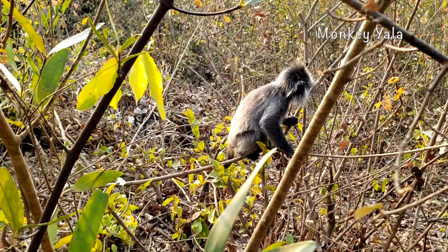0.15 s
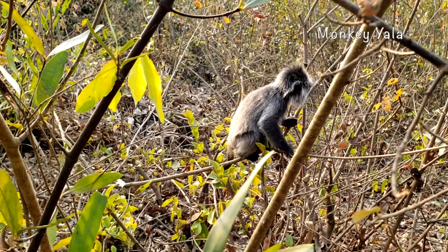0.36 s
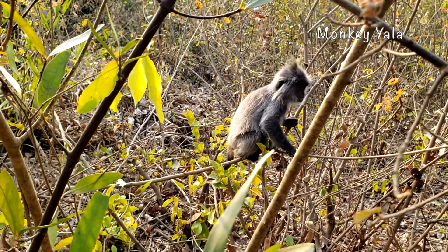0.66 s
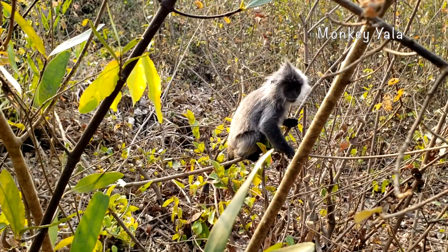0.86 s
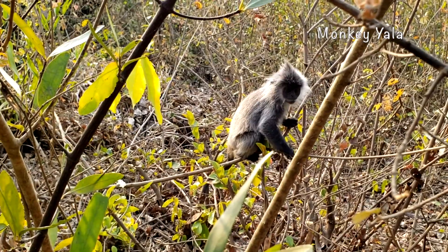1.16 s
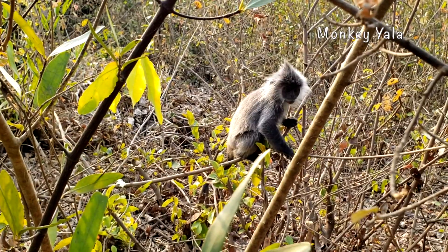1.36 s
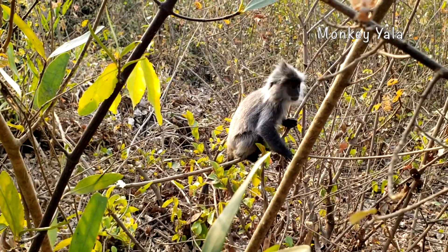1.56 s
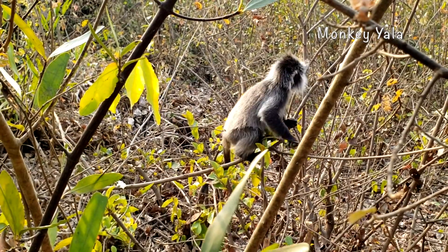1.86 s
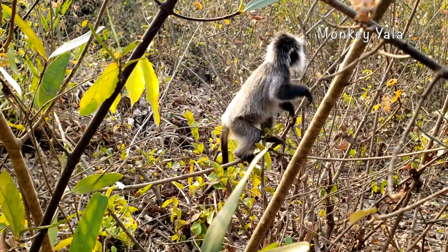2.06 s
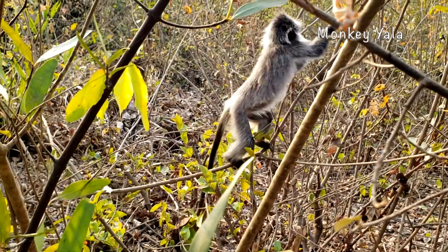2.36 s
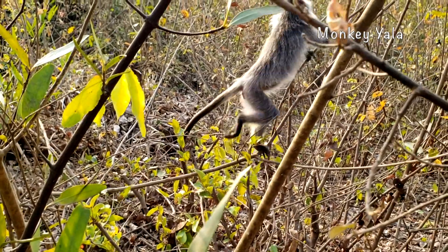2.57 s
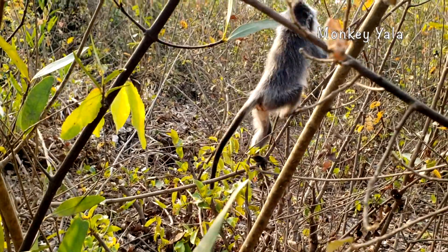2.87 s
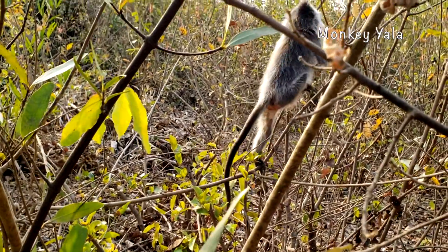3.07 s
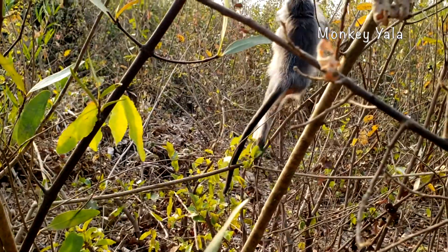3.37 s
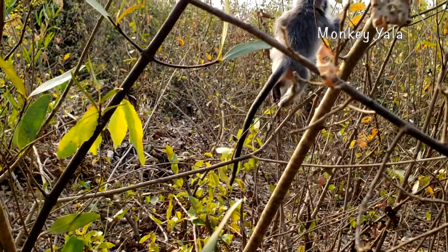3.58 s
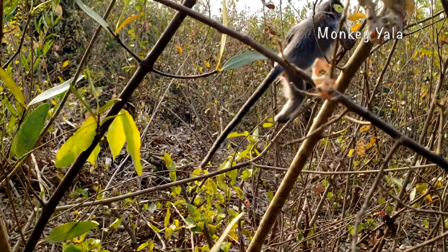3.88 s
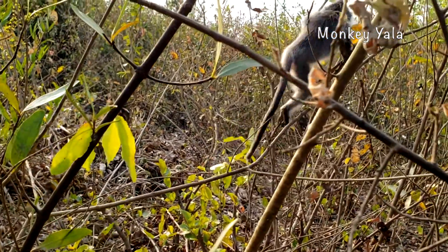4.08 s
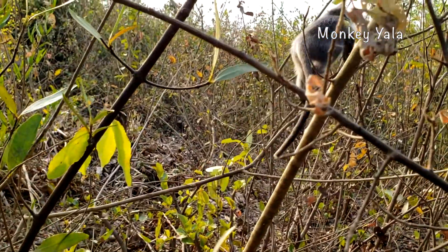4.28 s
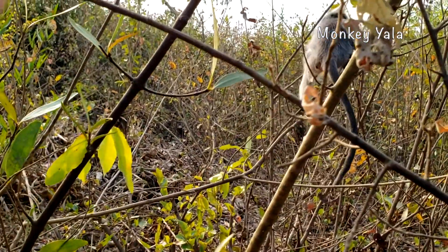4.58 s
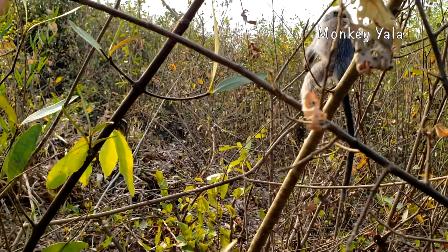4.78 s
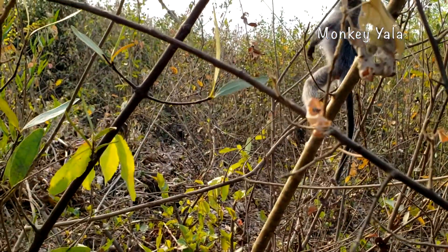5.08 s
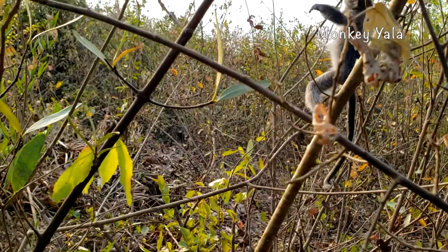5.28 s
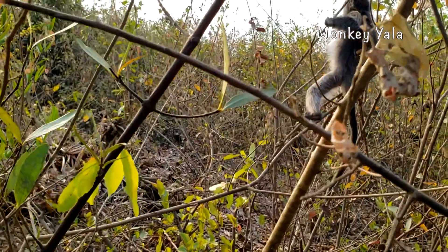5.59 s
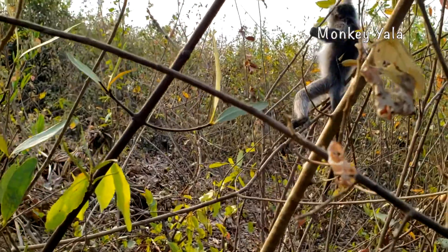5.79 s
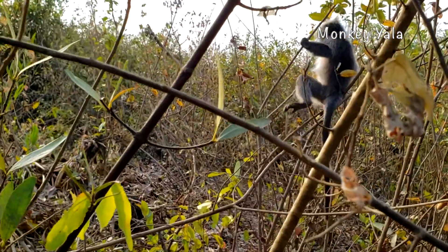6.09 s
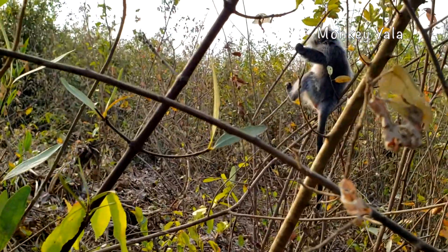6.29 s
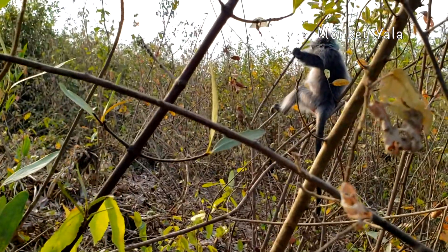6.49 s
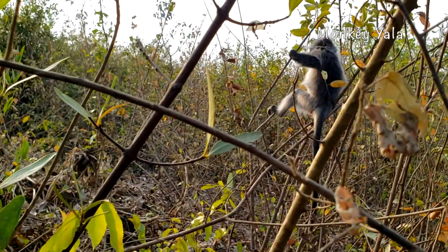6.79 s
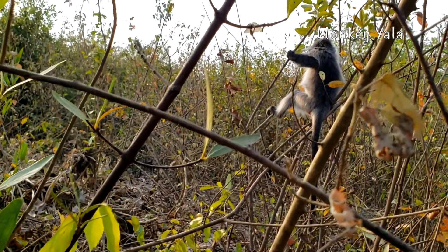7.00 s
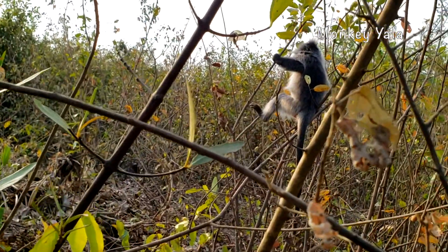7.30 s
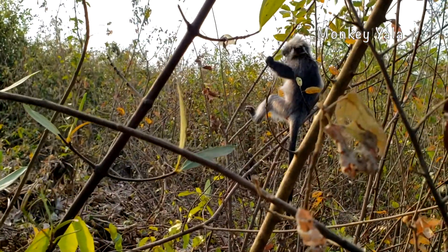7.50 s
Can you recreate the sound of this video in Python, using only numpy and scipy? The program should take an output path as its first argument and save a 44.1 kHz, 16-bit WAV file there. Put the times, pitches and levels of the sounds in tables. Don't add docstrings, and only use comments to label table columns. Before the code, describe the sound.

Outdoors in dry scrub, a near songbird opens with quick swooping warbles while a more distant bird repeats sharp V-shaped chirps. As they stop, a small animal climbs close to the microphone, scraping dry leaves and cracking twigs, busiest midway. The songbird then returns with a longer, lively bout of trills and arched notes. Low wind rumble and occasional thumps sit mostly on the right.

```python
import sys
import numpy as np
from scipy import signal
from scipy.fft import rfft, irfft
from scipy.io import wavfile
from scipy.ndimage import uniform_filter1d

SR = 44100
rng = np.random.default_rng(int(sys.argv[2]) if len(sys.argv) > 2 else 0)


def dump_mix(stems):
    frames = np.atleast_2d(stems).T
    limited = np.clip(frames, -1, 1)
    pcm = np.round(limited * 32767).astype(np.int16)
    wavfile.write(sys.argv[1], SR, pcm)


def gain_from_db(level_db):
    decades = np.asarray(level_db, float) / 20
    return 10 ** decades


N = 337365
TIME = np.arange(N) / SR


def curve(table):
    return np.interp(TIME, *np.transpose(table))


def by_hz(table, hz):
    f, value = np.transpose(table)
    return np.interp(np.log(hz + 1), np.log(f + 1), value)


def colour(x, table):
    hz = np.fft.rfftfreq(x.shape[-1], 1 / SR)
    top_hz = 15980
    return irfft(rfft(x) * gain_from_db(by_hz(table, hz)) * (hz < top_hz), x.shape[-1])


def band(x, lo_hz, hi_hz):
    return signal.sosfilt(signal.butter(2, [lo_hz, hi_hz], "bandpass", fs=SR, output="sos"), x)


def unit(x):
    return x / np.sqrt(np.mean(x ** 2))


def smooth(x, size):
    return uniform_filter1d(x, size=size)


def walk(rate_hz):
    k = int(SR / rate_hz)
    held = np.repeat(rng.standard_normal(N // k + 1), k)
    return unit(smooth(smooth(held, k), k)[:N])


def pan(x, db, lag=0):
    return np.array([x * gain_from_db(db / 2), np.roll(x, lag) * gain_from_db(-db / 2)])


def add(track, start_s, sound):
    i = int(start_s * SR)
    track[i:i + len(sound)] += sound[:N - i]


def glide(t, knots, values):
    gaps = np.diff(knots)
    slope = np.diff(values) / gaps
    same = np.maximum(slope[1:] * slope[:-1], 0)
    lean = np.r_[slope[0], 2 * same / (slope[1:] + slope[:-1] + 1e-9), slope[-1]]
    k = np.clip(np.searchsorted(knots, t, side="right") - 1, 0, len(slope) - 1)
    h = gaps[k]
    u = (t - knots[k]) / h
    ease = u * u * (3 - 2 * u)
    bend = (1 - u) * lean[k] - u * lean[k + 1]
    return values[k] + ease * h * slope[k] + h * u * (1 - u) * bend


def whistle(ms, hz, db, wobble=.005, third_db=-28, edge_ms=3, flutter=0):
    t = np.arange(0, ms[-1], 1000 / SR)
    pitch = glide(t, ms, np.asarray(hz, float))
    pitch *= 1 + wobble * unit(smooth(rng.standard_normal(len(t)), 60))

    flutter_hz, below_hz, settled_ms = 120, 3250, 45
    low_start = np.clip((below_hz - pitch) / 600, 0, 1) * np.clip((settled_ms - t) / 8, 0, 1)
    pitch *= 1 + flutter * low_start * np.sin(2 * np.pi * flutter_hz * t / 1000)

    level_db = glide(t, ms, db)
    waver = unit(smooth(smooth(rng.standard_normal(len(t)), 100), 100))
    softness = np.clip((level_db.max() - level_db) / 14, 0, 1)
    pitch *= 1 + .015 * softness * waver

    phase = 2 * np.pi * np.cumsum(pitch) / SR
    edges = np.clip(np.minimum(t, ms[-1] - t) / edge_ms, 0, 1)
    third = gain_from_db(third_db) * np.clip(1 - np.abs(pitch - 4200) / 900, 0, 1)
    tone = np.sin(phase) + third * np.sin(3 * phase)
    return np.sqrt(2) * gain_from_db(level_db) * edges * tone


def arch(length_s, start_hz, mid_hz, end_hz, db, wobble=0.01):
    u = np.linspace(0, 1, num=9)
    hz = np.polyval(np.polyfit([0, .5, 1], [start_hz, mid_hz, end_hz], deg=2), u)
    return whistle(1000 * length_s * u, hz, db - 8 * (2 * u - 1) ** 4, wobble, -52)


def scrub(x, t60_s, wet_db, sparse_db):
    t = np.arange(int(SR / 2)) / SR
    tail = rng.standard_normal((2, len(t))) * gain_from_db(sparse_db * rng.standard_normal((2, len(t))))
    tail = tail * gain_from_db(-60 * t / t60_s) * (1 - np.exp(-t / 0.0027))
    tail = tail / np.sqrt(np.sum(tail ** 2, axis=1, keepdims=True))
    return gain_from_db(wet_db) * signal.fftconvolve(x[None], tail, axes=1)[:, :N]


def air():
    # freq_hz, level_db (per Hz)
    spectrum = [(18, -30), (30, -9), (82, -1), (249, -13), (476, -26), (2500, -30), (3500, -23),
                (5300, -33), (7400, -46), (9500, -39), (11500, -31), (16000, -32)]
    # freq_hz, difference_db
    lean_left = [(100, -5.5), (400, -6), (1000, -2.5), (2400, 0), (15000, -3)]
    # freq_hz, likeness (0-1)
    likeness = [(60, 1), (200, 0.83), (700, 0.3), (1400, 0)]
    hz = np.fft.rfftfreq(N, 1 / SR)
    alike = np.clip(by_hz(likeness, hz), 0, 1)
    mid, side = rfft(colour(rng.standard_normal((2, N)), spectrum))
    ports = []
    for sign in (1, -1):
        port = mid * np.sqrt(1 + alike) + sign * side * np.sqrt(1 - alike)
        ports.append(port * gain_from_db(sign * by_hz(lean_left, hz) / 2))
    return unit(irfft(np.array(ports), N)) * gain_from_db(-63)


def wind():
    # time_s, level_db
    gust_levels = [(0.0, -59), (0.13, -77), (0.21, -57.5), (0.58, -67.5), (3.22, -66.5), (3.28, -46),
                   (3.32, -53), (3.43, -50), (3.47, -68), (3.64, -53), (4.43, -69.5), (4.69, -60),
                   (5.69, -65), (5.73, -44.5), (5.94, -55), (7.09, -65.5), (7.5, -53), (7.65, -61.5)]
    # time_s, peak_db, pitch_hz
    thumps = [
        (3.283, -40, 61),
        (5.75, -33, 54.2),
    ]
    gusts = unit(band(rng.standard_normal((2, N)), 33.3, 83))
    gusts = gusts * gain_from_db(curve(gust_levels) + 2 * walk(9) - 2.5)
    right = gusts[0]
    for s, db, hz in thumps:
        swell = np.exp(-((TIME - s) / 0.015) ** 2)
        right = right + gain_from_db(db) * swell * np.cos(2 * np.pi * hz * (TIME - s))
    right = 2 * right

    brush_s, brush_length_s, brush_db = 6.93, .09, -73
    brush = np.exp(-((TIME - brush_s) / brush_length_s) ** 2)
    right += gain_from_db(brush_db) * brush * unit(band(rng.standard_normal(N), 220, 650))
    return np.array([0.08 * right + 0.62 * gusts[1], right])


def chorus():
    # time_s, level_db
    chorus_levels = [(0, -64.5), (1.2, -64), (1.45, -62.5), (1.9, -65.5), (2.4, -69.5), (4, -91.5),
                     (5.2, -75), (6, -65), (7.65, -61.5)]
    blur = 0
    for lo in (2600, 3100, 3800, 4400):
        voices = band(band(rng.standard_normal((2, N)), lo, 1.3 * lo), lo, 1.3 * lo)
        blur = blur + gain_from_db(3 * walk(14)) * unit(voices)
    return gain_from_db(curve(chorus_levels)) * unit(blur)


def piper(far):
    # start_s, peak_db
    piped = [(2.5207, -68), (2.6379, -68), (2.8094, -66), (2.9642, -63), (3.1183, -59), (3.2735, -55.5),
             (3.4306, -54.5), (3.6032, -55.5), (3.7544, -53), (4.0966, -63), (4.2527, -66.5)]
    warm_hz, climb_hz_per_s, warm_at_s = 3530, 900, 2.96
    for start, db in piped:
        hz = warm_hz - climb_hz_per_s * max(warm_at_s - start, 0)
        add(far, start, arch(0.044, .97 * hz, .995 * hz, 1.01 * hz, db - 2.5, wobble=.018))


def chatter(far):
    ms, hz = np.array([0, 8, 17, 28.]), [4300, 3150, 2750, 1800]
    shape_db = np.array([-7, -2, 0, -12.])
    for first_s, last_s, db, count in ((1.328, 1.795, -66.5, 8), (7.254, 7.444, -68, 4)):
        for start in np.linspace(first_s, last_s, count):
            add(far, start, whistle(ms, hz, db + shape_db, wobble=.035))


def calls(far):
    # start_s, length_s, start_hz, end_hz, level_db
    glides = [(.01, 0.028, 3860, 3810, -63), (2.53, 0.087, 5430, 5160, -74.5),
              (.08, 0.2, 1450, 1580, -76.5), (0.419, 0.012, 5600, 5000, -54), (.431, .008, 5050, 5550, -52),
              (.438, .009, 5500, 4750, -56), (1.44, .12, 5150, 4950, -67.5), (1.55, .065, 4850, 4400, -67),
              (1.62, .06, 4400, 3950, -76), (.004, .02, 2750, 2700, -63), (.212, .01, 5250, 5150, -60),
              (.274, .012, 5250, 5100, -58), (2.475, .035, 3250, 3780, -68), (2.228, .022, 5500, 6500, -72),
              (2.06, .07, 2050, 1900, -81), (5.22, .07, 900, 900, -79), (5.62, .08, 1120, 1080, -81),
              (5.8, .17, 1100, 1050, -84), (5.345, .05, 6800, 4900, -70), (5.505, .02, 4300, 6200, -62),
              (5.635, .025, 4600, 6300, -58), (5.79, .05, 5600, 5000, -68), (5.762, .02, 4000, 6600, -62),
              (6.04, .016, 3000, 5400, -63), (1.725, .032, 6700, 4900, -72), (2.31, 0.05, 6750, 4720, -76),
              (3.28, 0.15, 5150, 4560, -69), (3.922, .04, 3750, 3850, -59),
              (3.818, 0.16, 5800, 5820, -70.5), (4.37, .41, 3540, 3360, -72.5),
              (4.863, 0.11, 3450, 3430, -74), (2.37, 0.055, 2760, 3750, -73), (4.93, .31, 5410, 5400, -74),
              (4.92, .07, 6050, 6030, -72)]
    # start_s, length_s, foot_hz, top_hz, level_db
    flicks = [(2.74, 0.07, 1100, 1300, -79), (1.89, .014, 5300, 7000, -63), (1.906, .022, 5150, 8400, -69),
              (2.212, .025, 3240, 5400, -62), (5.45, .15, 1150, 1200, -78), (6.09, 0.027, 1820, 2100, -61)]
    # start_s, length_s, start_hz, middle_hz, end_hz, level_db
    hoarse = (1.925, .14, 4700, 3250, 2800, -63)
    for start, length, hz, end_hz, db in glides:
        mid_hz = 1.008 * (hz + end_hz) / 2
        add(far, start, arch(length, hz, mid_hz, end_hz, db))
    for start, length, hz, top_hz, db in flicks:
        add(far, start, arch(length, hz, top_hz, hz, db))
    rasp = arch(*hoarse[1:], wobble=.07) + .7 * arch(*hoarse[1:], wobble=.14)
    add(far, hoarse[0], rasp * np.linspace(1.9, .5, len(rasp)))


def croaks(far):
    croak_levels = [-72, -72, -76.5, -73, -77, -77.5, -68]
    gap_s, length_s, base_hz = .27, .11, 265
    for turn, db in enumerate(croak_levels):
        for k, part_db in ((6, -4), (7, 0), (8, -6)):
            hz = k * base_hz
            partial = arch(length_s, .88 * hz, hz, .87 * hz, db + part_db - 5.5, wobble=.03)
            add(far, turn * gap_s, partial)


def second_bird():
    # time_ms, pitch_hz, level_db (under its top)
    v_note = [(0, 5100, -12), (6.25, 4800, -4), (13.27, 4300, -3), (28.92, 3400, -2), (36, 2900, -26),
              (41.56, 3800, -1.5), (57.6, 4250, -13)]
    # first_s, last_s, first_db, last_db
    bouts = [
        (.354, 1.224, -51, -54),
        (6.134, 7.017, -54, -53.5),
    ]
    voice = np.zeros(N)
    ms, hz, shape_db = np.transpose(v_note)
    for bout in bouts:
        for start, db in np.linspace(bout[::2], bout[1::2], num=8):
            add(voice, start, whistle(ms, hz, shape_db + db))
            add(voice, start - .022, arch(0.036, 5960, 5700, 5300, db - 10.5, wobble=0.08))
    return voice


def distant_birds():
    second, far = second_bird(), np.zeros(N)
    for sing in (piper, chatter, calls, croaks):
        sing(far)
    far = far * gain_from_db(1.5 * walk(60))
    wet = scrub(second, .5, -1, 3) + scrub(far, .25, -5, 3)
    return pan(second, 1) + pan(far, -1.7) + wet + chorus()


def efforts(table):
    still_db = -94
    power = gain_from_db(2 * still_db)
    for s, db, rise, fall in table:
        away_db = 10 * np.maximum((s - TIME) / rise, (TIME - s) / fall)
        power = power + gain_from_db(2 * (db - away_db))
    return np.sqrt(power)


def rustle():
    # time_s, peak_db, rise_s (10 dB), fade_s (10 dB)
    movements = [(1.94, -66, .007, .06), (2.1, -62, .07, .14), (2.55, -65, .1, .3), (2.72, -59.5, .15, .15),
                 (3.1, -70, .5, .5), (3.3, -59, .1, .1), (3.49, -48.5, .12, .3), (3.745, -46.5, .08, .05),
                 (4.14, -57.5, .25, .25), (4.5, -69, .5, .8), (4.88, -67, .3, .08), (5.1, -67, .005, .3),
                 (5.42, -60, .05, .6), (5.8, -65.5, .3, .2), (6.1, -76, .5, 40)]
    # freq_hz, level_db (per Hz)
    leaf = [(600, -12), (1500, -17), (2500, -15), (4700, 1.5), (7400, -5.5), (10000, 1.5), (15000, 0)]
    scrapes_per_s = 160
    flurry = (rng.random(N) < scrapes_per_s / SR) * gain_from_db(np.minimum(2.5 * rng.exponential(size=N), 6))
    fade = np.exp(-np.arange(2000) / SR / 0.0063)
    scrape = 0
    for lo in (600, 3000, 4500, 6700, 10000, 13000):
        share = signal.fftconvolve(flurry * gain_from_db(3.9 * rng.standard_normal(N)), fade)[:N]
        grit = gain_from_db(2.3 * rng.standard_normal((2, N))) * rng.standard_normal((2, N))
        grit = grit + 0.17 * rng.standard_normal(N)
        level = (.45 + .6 * unit(share)) * gain_from_db(2.25 * walk(15))
        scrape = scrape + level * band(grit, lo, max(1.67 * lo, 3000))
    return unit(colour(scrape, leaf)) * efforts(movements) * gain_from_db(6.5)


def snaps():
    # time_s, peak_db, wood_db (woody part under the crack)
    snapped = [(1.9375, -52, -1), (2.0946, -46, -12), (2.137, -49, -14), (2.4384, -52, -15),
               (2.5162, -50, -12), (2.6025, -41, -16), (2.6359, -46, -12), (2.6614, -45, -9),
               (2.7164, -41, -13), (2.7601, -47, -10), (2.798, -47, -13), (2.8374, -47, -20),
               (2.9262, -50, -10), (3.0011, -49, -14), (3.1487, -50, -7), (3.2026, -42, -22),
               (3.273, -51, -7), (3.2879, -47, -2), (3.3144, -45, -2), (3.3872, -41, -14),
               (3.481, -35, -14), (3.5279, -34, -17), (3.5857, -37, -10), (3.6606, -31, -23),
               (3.6855, -38, -14), (3.7065, -30, -16), (3.7339, -27, -16), (3.7459, -20, -21),
               (3.7514, -19, -23), (3.7818, -32, -11), (3.8172, -30, -12), (3.919, -39, -11),
               (3.9354, -39, -6), (3.9664, -29, -17), (4.0282, -33, -27), (4.0921, -38, -18),
               (4.1669, -29, -16), (4.3001, -50, -14), (4.4253, -45, -13), (4.4448, -39, -19),
               (4.4732, -45, -18), (4.5116, -48, -16), (4.6179, -38, -20), (4.6399, -33, -23),
               (4.6942, -42, -23), (4.7875, -48, -15), (4.8125, -31, -27), (4.8778, -45, -22),
               (5.0938, -41, -21), (5.3732, -40, -17), (5.4226, -30, -13), (5.5368, -46, -15),
               (5.5538, -46, 6), (5.6481, -42, 3), (5.7029, -44, -12), (5.8501, -43, -1), (5.8674, -46, 7),
               (6.6009, -52, -3), (7.3911, -41, 2)]
    ports = np.zeros((2, N))
    t = np.arange(1500) / SR
    noise = rng.standard_normal((len(snapped), 3, len(t)))
    burst = noise[:, :1] + .9 * noise[:, 1:]
    burst = burst * (np.exp(-t / .0016) + .28 * np.exp(-t / .012))
    cracks = band(band(burst, 6000, 16000), 3000, 16500)
    woods = band(burst, 2100, 6500)
    for (start, db, wood_db), crack, wood in zip(snapped, cracks, woods):
        crack = crack + gain_from_db(min(wood_db, -11) + 3) * wood
        for side in range(2):
            add(ports[side], start - .0005, crack[side] * gain_from_db(db - 4.5))
    return ports


def climber():
    return rustle() + snaps()


def trill(ms, first_hz, second_hz, db, count, second_db=0):
    odd = np.arange(count) % 2
    hz = np.where(odd, np.linspace(*second_hz, count), np.linspace(*first_hz, count))
    return list(zip(np.linspace(*ms, count), hz, np.linspace(*db, count) + odd * second_db))


def hopping_phrase():
    # time_ms, dip_hz, top_hz, dip_db
    dips = [
        (14, 2700, 4090, -12),
        (70, 3200, 4250, -17),
        (121, 3270, 4380, -17),
        (181, 3400, 3400, -18),
    ]
    shoulder_at, shoulder_rise, top_at = .36, .8, .76
    points = [(0, 2600, -19)]
    for (ms, dip, top, db), after in zip(dips, dips[1:]):
        span = after[0] - ms
        shoulder_hz = dip + shoulder_rise * (top - dip)
        points += [(ms, dip, db), (ms + shoulder_at * span, shoulder_hz, -.4), (ms + top_at * span, top, .3)]
    ms, dip, _, db = dips[-1]
    return points + [(ms, dip, db)]


def repertoire():
    plain = { "arch": [(0, 3140, -30), (18, 2970, -14), (58, 3960, 0), (67, 3870, -1), (75, 3140, -12),
             (83, 2100, -20)], "low": [(0, 2320, -21), (8, 2490, -4), (18.5, 2750, 0), (30.4, 2400, -24)],
             "peep": [(0, 4550, -9), (20, 4820, -2), (29, 4600, -12)], "soft": [(0, 3200, -12),
             (26, 3560, 2), (55, 2700, -12)], "wave": [(0, 4450, -16), (7, 4850, -5), (19, 4950, -2),
             (52, 4220, -3), (83, 4580, -1), (96, 4350, -1), (102, 3900, -12)], "dive": [(0, 4600, -14),
             (7, 4850, -4), (18, 4950, -2), (40, 4250, -3), (58, 4050, -4), (83, 4400, -1), (97, 4150, -2),
             (105, 2800, -20)], "lift": [(0, 4650, -9), (12, 4900, -3), (35, 5180, -2), (47, 5000, -12)]}
    stepped = { "stair": [(0, 2450, -24), (42, 3220, -11), (49, 3870, -8), (74, 3960, -4), (77.4, 3660, -4),
               (118, 4280, -3), (128, 3480, -10), (168, 4300, -5), (190, 3600, -18)],
               "thin": [(0, 6700, -10), (5, 5900, -8), (12, 7200, -14), (16, 6100, -2), (21, 6300, -16),
               (27, 6600, 0), (48, 5950, -4), (86, 6700, -3), (93, 6400, -11)], "late": [(0, 2950, -15),
               (14, 3250, -6), (36, 2750, -26), (54, 3800, -1), (72, 3600, -2), (82, 3150, -20),
               (98, 4200, 0), (122, 3900, 0), (135, 3700, -12)], "three": [(0, 3100, -15), (17, 3350, -5),
               (38, 2800, -24), (58, 3850, -1), (76, 3600, -2), (87, 3250, -18), (103, 4220, 0),
               (128, 3960, 0), (145, 3650, -14)]}
    swoop = [(0, 5030, -18)]
    swoop += trill((7.5, 35), (3350, 4700), (6200, 6500), (-15, 1.5), count=5, second_db=4)
    swoop += [(46, 5450, .5), (70, 4700, 1), (88, 4000, -3), (92, 2900, -16)]
    ripple = trill((0, 35), (7200, 8200), (5500, 6100), (-13, -14), count=6, second_db=8)
    ripple += trill((43, 143), (6550, 6000), (6100, 5600), (-1, -12), count=11)
    shake = [(0, 5640, -18), (20, 6000, -1)]
    shake += trill((24.5, 59), (6550, 6450), (6000, 5250), (1.5, -2.5), count=6)
    shake += [(63.4, 5210, -15)]
    purr = [(0, 3400, -14)]
    purr += trill((11, 44.5), (3250, 3100), (3450, 4150), (-4, -1.5), count=9)
    purr += [(50, 3100, -3), (65, 2400, -14)]
    flourish = [(0, 4730, -23), (8.5, 5460, -11), (28, 6110, -5), (35.9, 5080, -4)]
    flourish += trill((43, 78), (6600, 6650), (5500, 5600), (-23, -18), count=5, second_db=-2)
    flourish += [(96, 5150, -1), (118, 4900, -2), (124, 4400, -16)]
    return {**plain, **stepped, "hops": hopping_phrase(), "swoop": swoop, "ripple": ripple,
            "shake": shake, "purr": purr, "flourish": flourish}


def songbird():
    # start_s, syllable, stretch (ratio), pitch (ratio), level_db
    song = [(0.046, "swoop", 0.95, 0.99, -41), (0.198, "arch", 1.02, 1.016, -38),
            (0.293, "low", 0.96, 0.98, -51), (0.412, "ripple", 0.98, 0.97, -43.5),
            (0.468, "peep", 1.07, 0.99, -42.5), (0.523, "peep", 1.1, 0.95, -45),
            (0.652, "hops", 0.99, 1.0, -40.5), (0.908, "shake", 0.98, 0.99, -42.5),
            (1.025, "stair", 0.97, 0.99, -38), (5.125, "soft", 1.01, 0.98, -58),
            (5.248, "wave", 0.99, 1.01, -45.5), (5.438, "purr", 0.98, 1.004, -44),
            (5.56, "wave", 1.0, 0.99, -39), (5.739, "purr", 0.94, 1.026, -42.5),
            (5.864, "dive", 1.0, 1.0, -38.0), (6.035, "thin", 0.96, 0.99, -48.5),
            (6.087, "lift", 1.0, 1.0, -39.5), (6.222, "three", 0.95, 1.016, -37.5),
            (6.432, "flourish", 1.0, 1.0, -39), (6.642, "three", 1.01, 0.99, -38.5),
            (6.859, "flourish", 1.03, 1.006, -39.5), (7.079, "late", 1.0, 1.0, -39),
            (7.284, "flourish", 1.08, 1.013, -40), (7.512, "late", 1.03, 0.99, -39.5)]
    voice, known = np.zeros(N), repertoire()
    for start, syllable, stretch, ratio, db in song:
        ms, hz, shape_db = np.transpose(known[syllable])
        add(voice, start, whistle(ms * stretch, hz * ratio, shape_db + db, flutter=.06))
    bounced = voice + 0.12 * np.roll(voice, 130)
    return pan(bounced, 2.7, lag=1) + scrub(voice, 0.44, -9, 2)


def scene():
    return air() + wind() + distant_birds() + climber() + songbird()


def thin_treble(x):
    mask_db, hush_db, spread_db, from_hz = -44, -104, 3.5, 4600
    weaker_above_hz, fall_db_per_khz = 9200, 3
    hz, _, spec = signal.stft(x, SR, nperseg=2048, noverlap=1024)
    bins = 12
    group = np.arange(len(hz)) // bins
    power = np.add.reduceat(np.abs(spec) ** 2, np.arange(0, len(hz), bins), axis=1).mean(axis=0)
    db = 10 * np.log10(power + 1e-18)
    chance = uniform_filter1d(rng.standard_normal(db.shape), size=3, axis=1) * np.sqrt(3)
    fall = fall_db_per_khz * np.maximum(hz[::bins] - weaker_above_hz, 0) / 1000
    loudest = db[7:].max(axis=0)
    limit = np.maximum(loudest + mask_db - fall[:, None], hush_db) + spread_db * chance
    keep = (db > limit)[group] | (hz < from_hz)[:, None]
    return signal.istft(spec * keep, SR, nperseg=2048, noverlap=1024)[1][:, :N]


def band_limit(x):
    return signal.sosfilt(signal.butter(12, 16050, fs=SR, output="sos"), x)


def record(dry):
    quieted = thin_treble(dry)
    return band_limit(quieted)


dry = scene()
out = record(dry)
dump_mix(out)
```